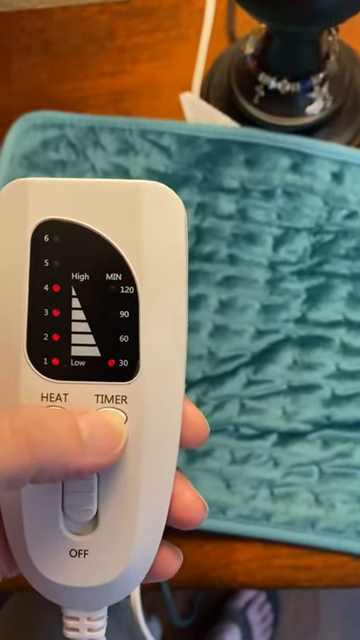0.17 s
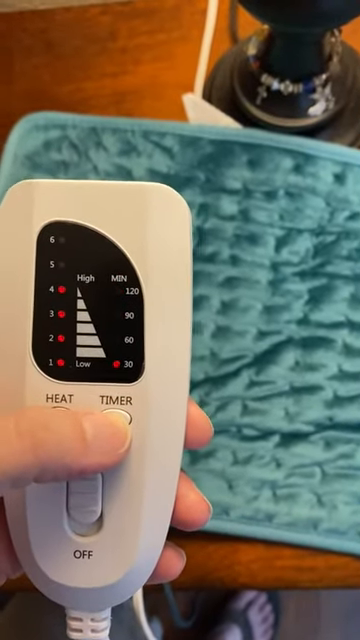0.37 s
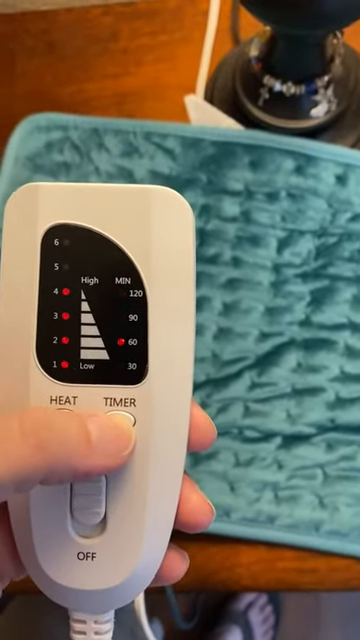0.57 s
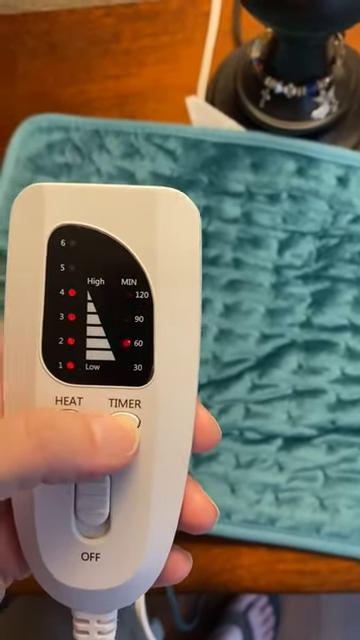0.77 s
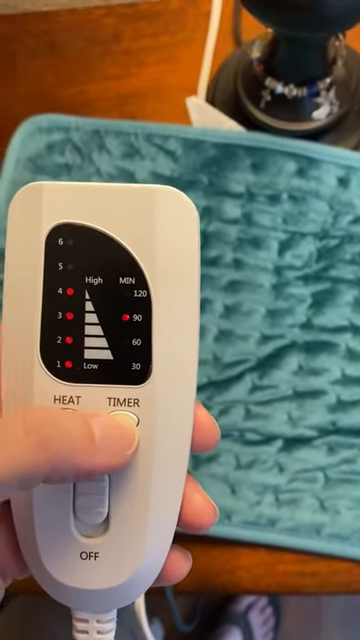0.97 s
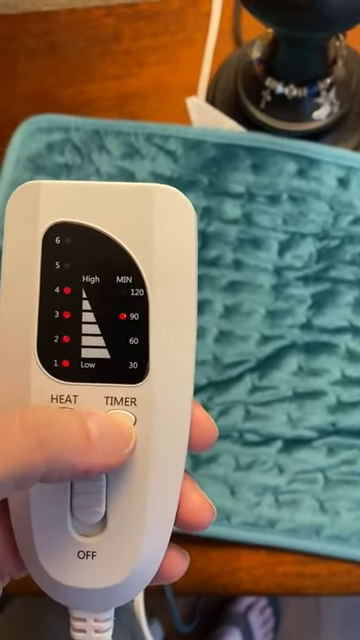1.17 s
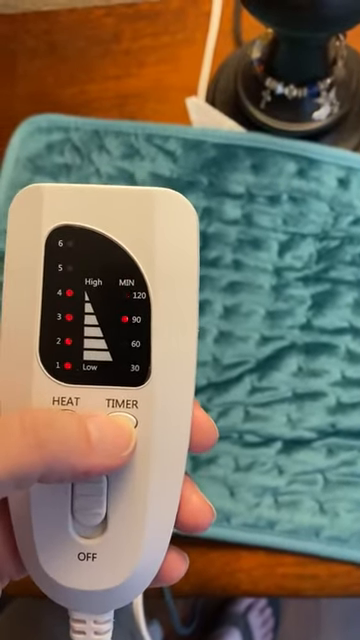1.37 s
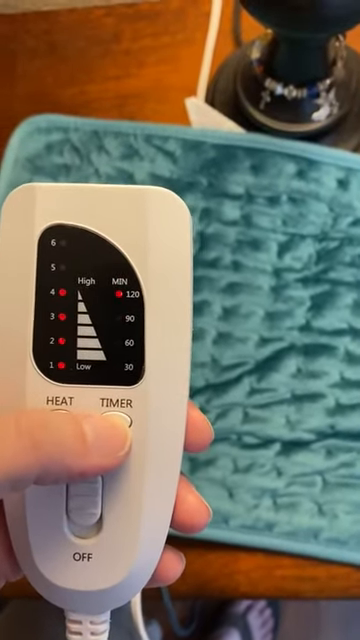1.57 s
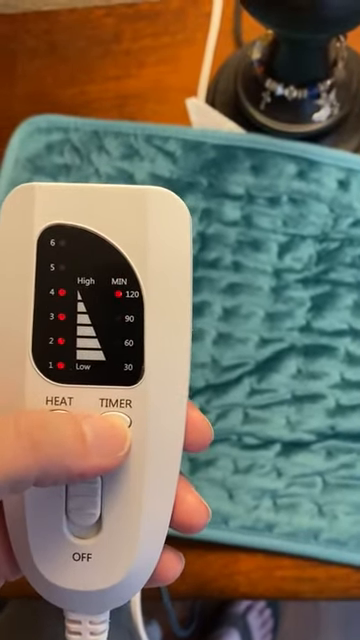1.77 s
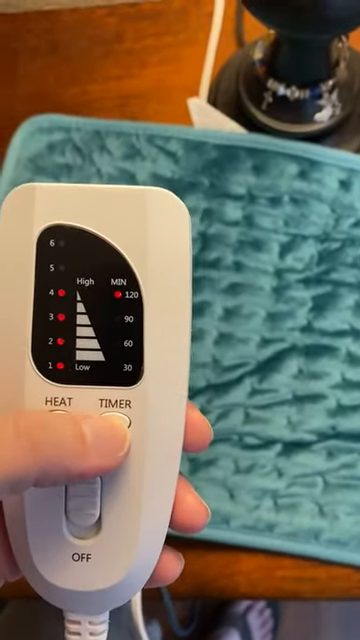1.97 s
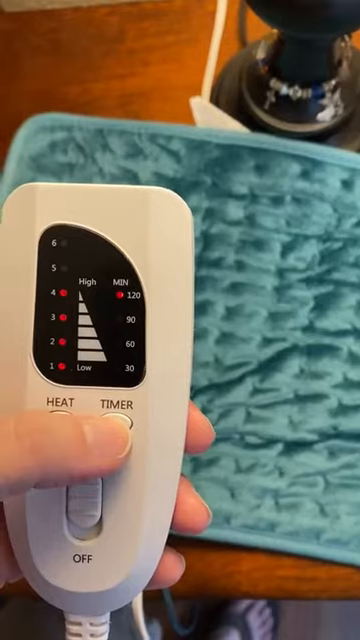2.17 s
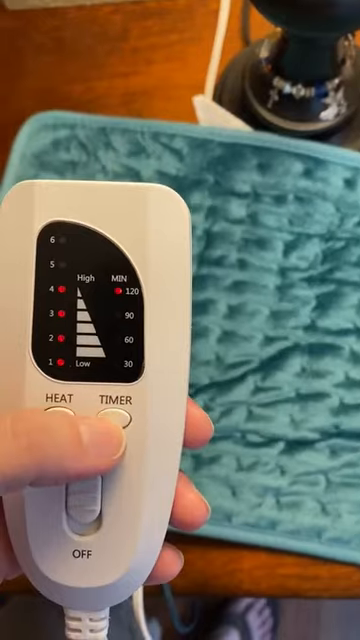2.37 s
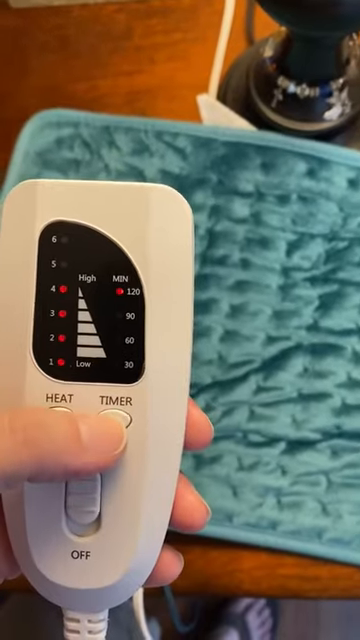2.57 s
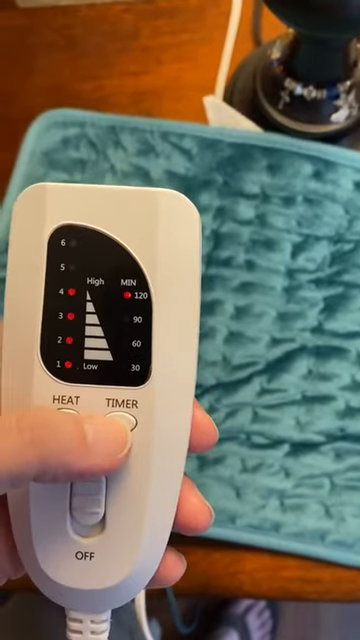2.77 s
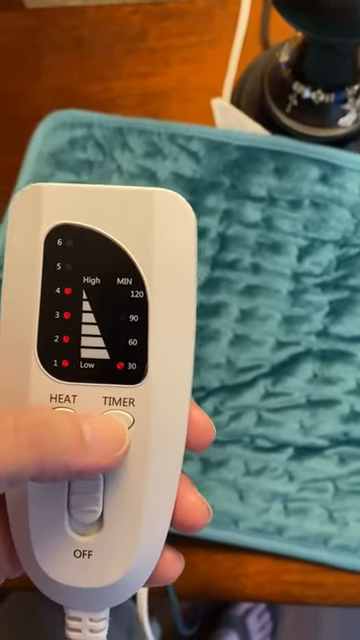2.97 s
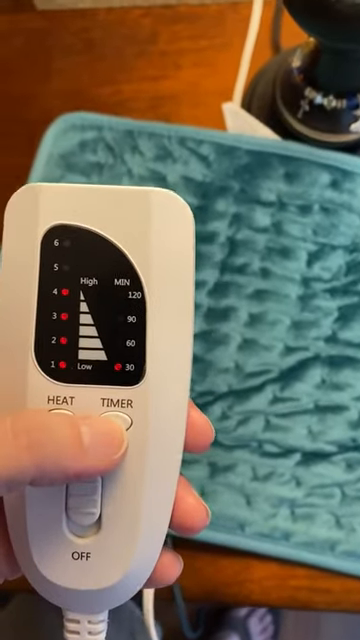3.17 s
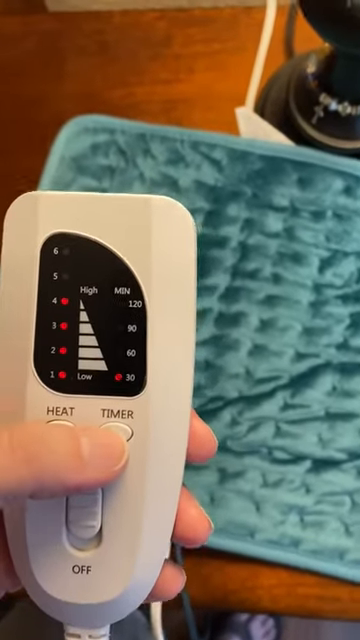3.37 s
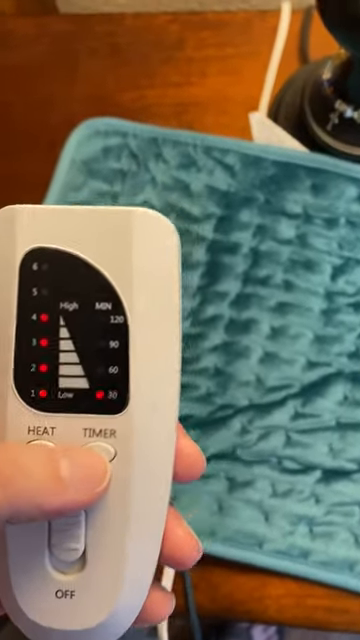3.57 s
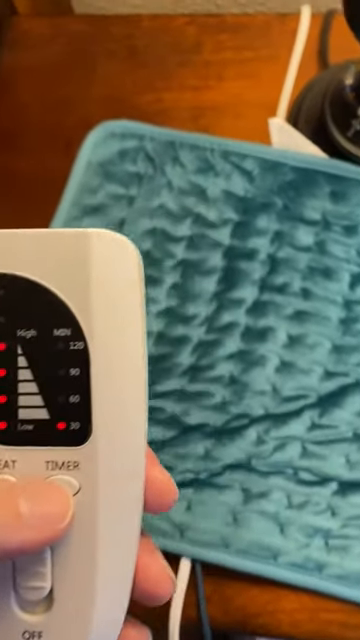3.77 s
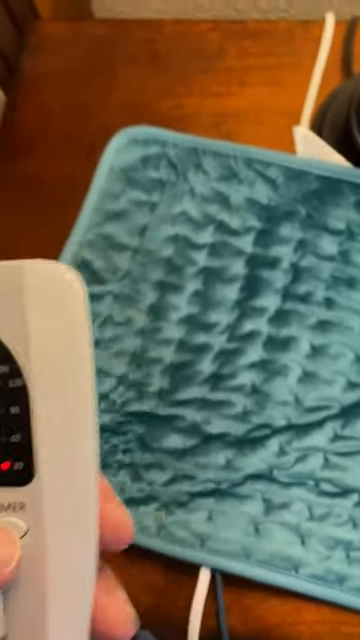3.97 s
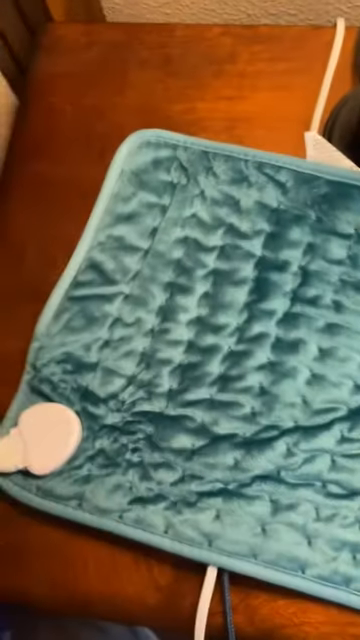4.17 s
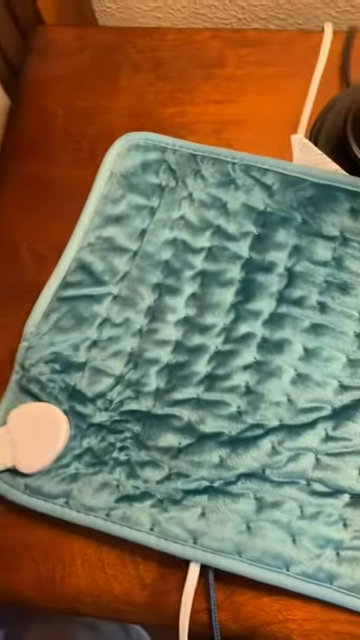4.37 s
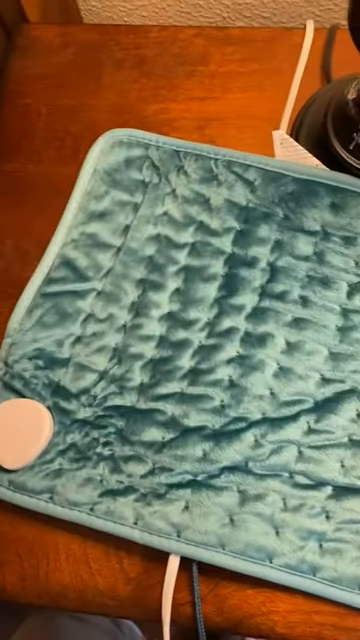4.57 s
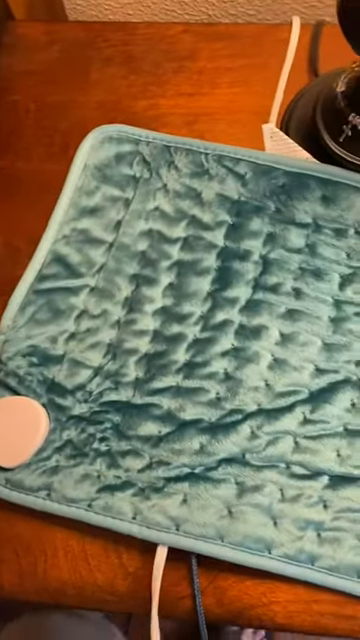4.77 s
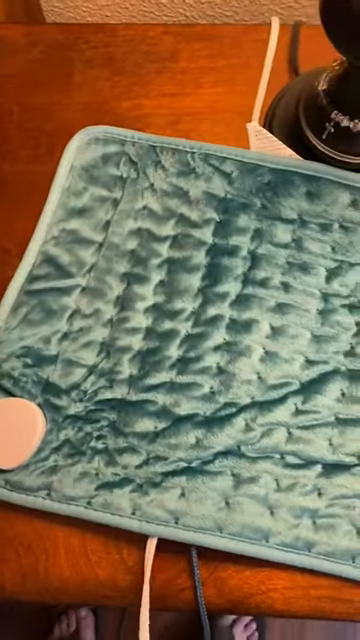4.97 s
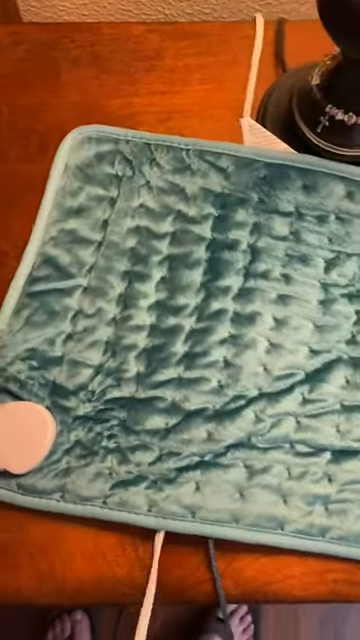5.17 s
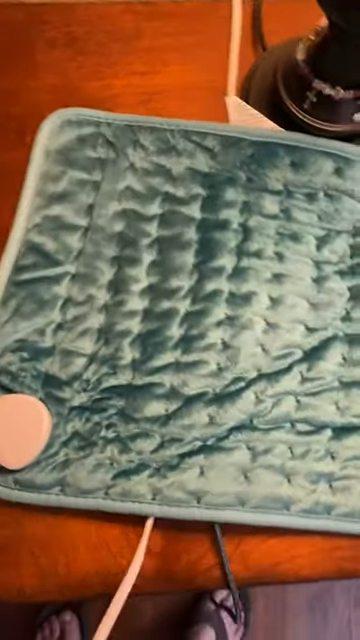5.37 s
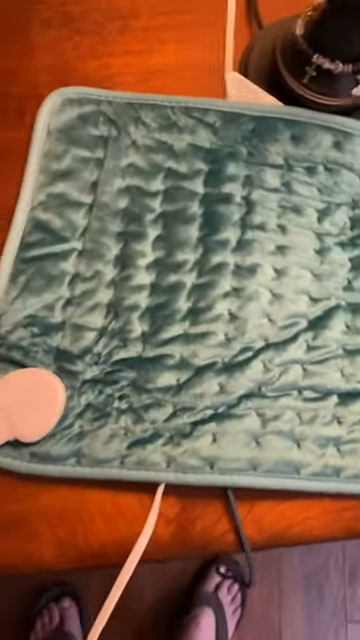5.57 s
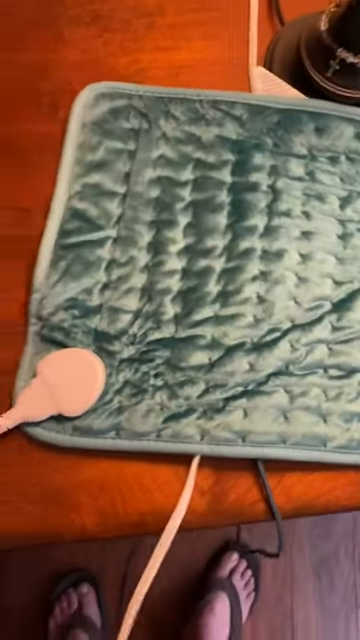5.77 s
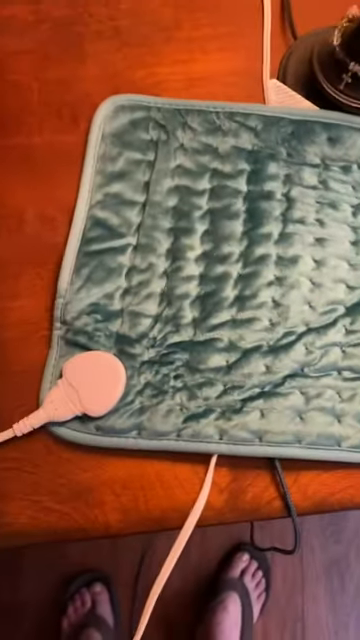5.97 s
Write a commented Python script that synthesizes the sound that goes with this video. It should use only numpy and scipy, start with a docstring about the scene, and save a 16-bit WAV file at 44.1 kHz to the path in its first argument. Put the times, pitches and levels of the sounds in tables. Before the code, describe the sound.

In a quiet room, a low boom fades as a thumb presses a button on a hollow plastic controller five times, close to the microphone. Each press snaps brightly and each release pops back duller. The case creaks faintly in the grip. Then a sleeve rustles, the controller is set down with a soft knock and a few taps, and its cord scrapes briefly over the table edge. A low hum lies underneath.

```python
"""A low boom fades in a quiet room as a thumb clicks a plastic heating-pad controller five times, close by.
Each press snaps a metal dome (bright), each release pops it back (dull); both ring the hollow case.
Between clicks the thumb rubs, the case creaks and a faint drone comes and goes. Then a sleeve rustles,
the controller is laid down at 5 s with a soft knock and a few taps, and its cord drags over the
table edge. Mains hum and room air lie under it all."""
import sys
import numpy as np
from scipy import signal
from scipy.fft import rfft, irfft
from scipy.io import wavfile
from scipy.ndimage import uniform_filter1d

SR = 44100
rng = np.random.default_rng(int(sys.argv[2]) if len(sys.argv) > 2 else 0)


def put_to_file(sound):
    """Save the sound as 16-bit audio at rate SR, in the file named by the first command-line argument."""
    columns = np.atleast_2d(sound).T  # one column per channel
    safe = np.clip(columns, -1, 1)
    whole_steps = np.round(safe * 32767)
    wavfile.write(sys.argv[1], SR, whole_steps.astype(np.int16))


N = 265041
TIME_S = np.arange(N) / SR
EVENT_SAMPLES, LEAD_SAMPLES = 8192, 128

# dome snaps in: start_s, level_db, tilt_db_per_octave
DOME_PRESSES = [(.0742, -3.5, 0.2), (.4622, -1.5, -1.23), (.8350, -1, -1.3), (1.4182, -2.93, -1.3),
                (2.8311, -0.5, 0.18)]
# dome springs back: start_s, level_db, tilt_db_per_octave
DOME_RELEASES = [(.2271, -1, -0.74), (.6184, -2.2, -2.2), (1.0026, -1.5, -2.35), (1.5942, -2, -2),
                 (3.0105, -1.5, -3)]
# case and dome modes: centre_hz, width_hz, press_db, release_db, left_minus_right_db
CASE_MODES = [(286.3, 170, -2.5, -1, 1.5), (418, 48, 3, 3, -4), (535.3, 40, 1.5, -5, -1),
              (615, 62, 6, 6.5, -4), (714, 58, 2, 8, -2.5), (829, 46, 6, 10.5, -0.5),
              (980.4, 51, 6, 9.5, 3.5), (1032, 200, -4.5, 0.5, 10), (1530, 150, -5, -8.5, 7),
              (1750, 59, -3, 2, 6), (1950, 91, -6.5, 0.5, 2), (2525, 370, -14.5, -6.5, -6),
              (2990, 470, -9, -5, 3.5), (3184, 170, 3, -1.5, -2.5), (3760, 120, -20.5, -8.5, 3.5),
              (4198, 234, 1, -10.5, 11), (4534, 240, 4, -2.5, 0.5), (5610, 270, 2.5, -7.5, 4.5),
              (5640, 150, -6.5, -14, 6.5), (6810, 400, 9.5, -8.5, -1.5), (7030, 1000, 5, -20.5, 2),
              (7740, 340, 2, -11.5, -8), (8280, 120, -13.5, -19, -6.5), (11000, 890, -3, -12, -0.5),
              (13110, 710, -16.5, -30, -1.5), (14500, 1116, -9.5, -21, 5)]
# snap radiated into the room: freq_hz, press_db, release_db
RADIATION = [(150, -24.5, -20.5), (410, -9, -1.5), (843.7, -12.5, -15.5), (1260, -20.5, -19.5),
             (1540, -18, -15), (2290, -17, -21.5), (3420, -17, -20.5), (4630, -16, -20), (6360, -22, -26),
             (9000, -29, -37.5), (11000, -28.5, -27), (16000, -36, -42)]
# path difference between two microphone ports: freq_hz, left_lead_rad
PORT_PHASE = [(6000, 0.5), (6800, 1.76), (9000, -4.5), (13300, -8.5), (16000, -14)]


def dome_snaps(snaps, modes_db, radiation, scatter_db, travel_s, chatter_db, chatter_t60_s):
    """Each snap rings the case and chatters the key cap; returns near sound and room send."""
    near, send = np.zeros((2, 2, N))
    hz, t = bins(EVENT_SAMPLES), TIME_S[:EVENT_SAMPLES]
    # bending waves cross the shell in travel_s at 1 kHz, faster when higher
    travel_rad = 4 * np.pi * travel_s * np.sqrt(1000 * hz)
    port_rad = np.outer([1, 0], along(PORT_PHASE, hz))
    path = np.exp(1j * (port_rad - travel_rad - 2 * np.pi * hz * LEAD_SAMPLES / SR))
    chatter_envelope = fade(t, chatter_t60_s) * np.minimum(t * SR / LEAD_SAMPLES, 1)
    for start_s, level_db, tilt_db in snaps:
        ring = 0
        for k, (centre_hz, width_hz, _, _, side_db) in enumerate(CASE_MODES):
            detune, scatter = rng.standard_normal(2)
            # the grip shifts each mode; neighbours swing in opposite senses
            mode = (-1) ** k * resonance(hz, centre_hz * (1 + 0.0026 * detune), width_hz)
            ring = ring + undb(modes_db[k] + scatter_db * scatter) * pan(side_db) * mode
        chatter = rng.standard_normal((2, EVENT_SAMPLES)) * chatter_envelope
        chatter = rfft(chatter / np.linalg.norm(chatter[0])) * treble(hz, corner_hz=2390)
        hardness = undb(level_db + tilt_db * np.log2(np.maximum(hz, 500) / 1500))
        click = minimum_phase(abs(ring) * hardness) * (1 + undb(chatter_db) * chatter)
        radiated = minimum_phase(undb(along(radiation, hz)) * hardness)
        add(near, start_s - LEAD_SAMPLES / SR, irfft(click * path))
        add(send, start_s, irfft(radiated)[None])
    return near, send


def button():
    """The dome snaps in bright and pops back dull; returns near sound and room send."""
    _, _, press_db, release_db, _ = np.transpose(CASE_MODES)
    hz, press_send_db, release_send_db = np.transpose(RADIATION)
    press, press_send = dome_snaps(DOME_PRESSES, press_db, np.c_[hz, press_send_db], scatter_db=1.73,
                                   travel_s=0.0009, chatter_db=-9.5, chatter_t60_s=0.012)
    release, release_send = dome_snaps(DOME_RELEASES, release_db, np.c_[hz, release_send_db],
                                       scatter_db=2, travel_s=0.0014, chatter_db=0, chatter_t60_s=0.035)
    return press + release, press_send + release_send


# parts inside the case: centre_hz, width_hz, gain_db
INNER_MODES = [(1610, 9, -3.5), (4470, 30, -11)]


def inner_ring(clicks):
    """Lightly damped parts ring on after each click."""
    hz = bins(2 * N)
    modes = sum(undb(db) * resonance(hz, centre_hz, width_hz) for centre_hz, width_hz, db in INNER_MODES)
    return irfft(rfft(clicks, 2 * N) * modes)[:, :N]


# slips in the grip: start_s, level_db, centre_hz, t60_s
CASE_CREAKS = [(.755, -5, 530, .044), (0.757, -34.5, 6340, .13), (.786, -7.5, 480, .076),
               (.793, -31.5, 6000, .05), (1.09, -19.5, 740, .07), (1.506, -18, 885, .06),
               (2.287, -32.5, 2307, .05), (2.369, -22, 855, .2), (2.494, -16, 800, .035),
               (2.594, -16, 850, 0.14), (2.6, -36, 1800, .2), (3.101, -10.5, 484, .1),
               (3.143, -17.5, 539, 0.082), (3.632, -31.5, 11620, 0.065), (4.031, -25.5, 790, 0.065)]


def creaks(width_ratio=0.18):
    """The case slips in the hand, each time in one narrow resonance."""
    return ticks([(start_s, db, hz, width_ratio * hz, t60_s) for start_s, db, hz, t60_s in CASE_CREAKS])


# light contacts: start_s, level_db, centre_hz, width_hz, t60_s
LANDING_TAPS = [(5.008, -23.5, 890, 580, 0.062), (5.030, -26.5, 3020, 5040, 0.069),
                (5.064, -7, 710, 360, 0.17), (5.6236, -28, 5960, 1100, 0.015),
                (5.6655, -29, 6520, 1210, 0.017), (5.7694, -12.5, 5100, 2340, 0.028),
                (5.771, -3.5, 915, 202, 0.069), (5.773, -1.5, 374, 119, 0.094),
                (5.777, -14, 4950, 2334, 0.04), (5.825, -25, 1350, 1990, 0.03),
                (5.897, -35.5, 1930, 2400, .018)]


def taps():
    """Case and cord tap against things as they are laid down."""
    return ticks(LANDING_TAPS)


# cushioned blows: start_s, level_db, pitch_hz, t60_s
LANDING_KNOCKS = [(5.008, -44, 410, 0.045), (5.064, -35, 346, 0.048), (5.082, -29, 322, 0.028),
                  (5.096, -31.5, 69.5, 0.18), (5.104, -37.5, 143, 0.19)]


def knocks(contact_s=0.012):
    """The controller comes to rest: low damped swings with a soft start."""
    out, t = np.zeros((2, N)), TIME_S[:2 * EVENT_SAMPLES]
    for start_s, level_db, pitch_hz, t60_s in LANDING_KNOCKS:
        envelope = undb(level_db) * fade(t, t60_s) * (1 - fade(t, contact_s))
        add(out, start_s, pan(-1.2) * envelope * np.sin(2 * np.pi * pitch_hz * t))
    return out


# arm movements: start_s, length_s, level_db, hiss_relative_db, fold_hz
ARM_STROKES = [(3.662, 0.32, -91, 5, 900), (4.166, 0.23, -76, -6.5, 1480), (4.382, .22, -77.5, -3.5, 4270),
               (4.572, 0.14, -65, 1, 1960), (4.719, 0.24, -65.5, -7.5, 875),
               (4.971, 0.068, -61.5, -1.5, 950), (5.125, 0.064, -67, -5, 880),
               (5.222, 0.46, -80.5, 0.5, 2650), (5.715, 0.091, -69.5, -3, 1500)]
# cloth rustle: freq_hz, level_db
CLOTH_SPECTRUM = [(200, -10), (400, -3.5), (900, -1.5), (1400, -6), (2500, -6.5), (4000, -13), (8000, -28),
                  (16000, -42)]
# fibre hiss: freq_hz, level_db
FIBRE_SPECTRUM = [(1000, -7), (2500, -1.5), (4500, 3), (7000, 4.5), (9000, -10.5), (11000, 3),
                  (16000, -9.5)]


def sleeve(fold_db=-4.5, fold_q=2.1):
    """Each arm stroke rustles the cloth, makes the fibres hiss and sounds a hollow fold."""
    *_, hiss_db, fold_hz = np.transpose(ARM_STROKES)
    gains = stroke_gains(ARM_STROKES, attack_s=0.065, release_t60_s=0.54)
    cloth_gain = np.linalg.norm(gains, axis=0)
    fibre_gain = np.linalg.norm(gains * undb(hiss_db)[:, None], axis=0)
    cloth = friction(CLOTH_SPECTRUM, grain_db=1.5, grain_hz=250, patchy_db=-1, alike_hz=400)
    fibres = friction(FIBRE_SPECTRUM, grain_db=2, grain_hz=1400, patchy_db=2.9, alike_hz=417)
    out = cloth_gain * cloth + fibre_gain * fibres
    slips = diffuse(alike_hz=700) * undb(3.3 * wander(120))
    for gain, hz in zip(gains, fold_hz):
        peak = signal.iirpeak(hz, fold_q, fs=SR)
        fold = signal.lfilter(*peak, signal.lfilter(*peak, slips))
        out += undb(fold_db) * gain * fold / fold.std()
    return out


# thumb slides: start_s, length_s, level_db
THUMB_RUBS = [(.1, 0.59, -74), (.75, 0.15, -64), (1.04, .09, -84.5), (1.64, 0.078, -96.5),
              (2.345, 0.087, -75), (2.56, 0.087, -72), (2.68, 0.11, -78.5), (3.06, 0.12, -78.5),
              (3.85, 0.14, -81)]
# skin on plastic: freq_hz, level_db
RUB_SPECTRUM = [(200, -22), (450, -3), (850, -6), (1300, -16), (2000, -18.5), (3000, -25.5), (6000, -42)]


def thumb(grip_db=-87.5):
    """The thumb rubs the case, over the faint constant stir of the grip."""
    rubs = stroke_gains(THUMB_RUBS, attack_s=0.052, release_t60_s=0.39)
    gain = np.hypot(np.linalg.norm(rubs, axis=0), undb(grip_db))
    return gain * friction(RUB_SPECTRUM, grain_db=2.5, grain_hz=250, patchy_db=3, alike_hz=910)


# cord scrape: freq_hz, level_db
CORD_SPECTRUM = [(250, -17), (400, 5.5), (800, 2.5), (1300, -8), (1670, -8.5), (1940, 12.5), (2300, -5.5),
                 (2900, -3), (3700, -11), (4700, -8.5), (7000, -38), (12000, -57)]


def cord(level_db=-59):
    """The cord scrapes over the table edge."""
    gain = undb(level_db) * swell(start_s=5.9, length_s=0.082, attack_s=0.037, release_t60_s=0.26)
    return gain * friction(CORD_SPECTRUM, grain_db=2.5, grain_hz=500, patchy_db=1, alike_hz=900)


def reflections(send):
    """Table and hand answer within milliseconds, the furnished room a little later."""
    bright = irfft(rfft(send) * treble(bins(N), corner_hz=900), N)
    table = echoes(bright, level_db=2, t60_s=0.08, delay_s=0.0033, build_s=0.0018, pan_db=1.5)
    room = echoes(send, level_db=-5.5, t60_s=0.34, delay_s=0.018, build_s=0.0058, pan_db=1)
    return table + room


def boom(level_db=-42.5):
    """A low opening boom sags in pitch and dies away."""
    gain = undb(level_db) * swell(start_s=0, length_s=0.26, attack_s=0.012, release_t60_s=2.8)
    return pan(0.3) * gain * tone(pitch_hz=56.6, glide_hz_per_s=-11)


def mains_hum(level_db=-55):
    """Steady hum at the mains frequency."""
    return pan(0.3) * undb(level_db) * tone(pitch_hz=60)


# faint tones: start_s, length_s, pitch_hz, glide_hz_per_s, level_db
DRONE_TONES = [(1.803, .68, 312.2, 8, -70), (3.087, 0.44, 349, -26.5, -75)]


def drone(waver_db=1.5):
    """A faint gliding drone comes and goes, wavering in level."""
    out = np.zeros(N)
    for start_s, length_s, pitch_hz, glide_hz_per_s, level_db in DRONE_TONES:
        gain = undb(level_db) * swell(start_s, length_s, attack_s=0.17, release_t60_s=1.3)
        out += gain * tone(pitch_hz, glide_hz_per_s, start_s)
    return out * undb(waver_db * wander(7))


# still air: freq_hz, level_db
AIR_SPECTRUM = [(50, -28.5), (90, -1.5), (160, -4.5), (205, -15), (300, -13.5), (400, -21), (660, -36.5),
                (1750, -41.5), (3600, -47), (6300, -47), (9000, -58), (16000, -60.5)]


def room_air(level_db=-63, dip_db=-7.5):
    """Still room air, whose bass dips for about a second."""
    still = undb(level_db) * colour(diffuse(alike_hz=353), AIR_SPECTRUM)
    bass = irfft(rfft(still) * (1 - treble(bins(N), corner_hz=670)), N)
    dip = undb(dip_db * swell(start_s=3.65, length_s=0.99, attack_s=0.6, release_t60_s=1.7))
    return still + (dip - 1) * bass


def rumble(level_db=-58.5):
    """Steady low room noise."""
    spectrum = [(15, -38), (35, -19.5), (58, 1.5), (85, -7.5), (125, -17.5), (190, -44), (800, -84.5)]
    return undb(level_db) * colour(diffuse(alike_hz=182), spectrum)


def ticks(contacts):
    """Brief rough contacts, each through one steep-sided resonance."""
    out, hz, t = np.zeros((2, N)), bins(EVENT_SAMPLES), TIME_S[:EVENT_SAMPLES]
    for start_s, level_db, centre_hz, width_hz, t60_s in contacts:
        noise = rng.standard_normal((3, EVENT_SAMPLES))  # left, right, common
        burst = (noise[:2] + 0.76 * noise[2]) * fade(t, t60_s)
        burst /= np.linalg.norm(burst[0])
        body = resonance(hz, centre_hz, 2 * width_hz) ** 2
        add(out, start_s, undb(level_db) * irfft(rfft(burst) * body))
    return out


def friction(spectrum, grain_db, grain_hz, patchy_db, alike_hz):
    """Sliding contact: tiny uneven slips, coming in patches; rms 1."""
    slips = diffuse(alike_hz) * undb(grain_db * wander(grain_hz) + patchy_db * wander(35))
    return colour(slips, spectrum)


def echoes(x, level_db, t60_s, delay_s, build_s, pan_db):
    """A diffuse wash that builds after a delay and dies away."""
    t = TIME_S[:3 * EVENT_SAMPLES]
    onset = np.clip((t - delay_s) / build_s, 0, 1)
    response = rng.standard_normal((2, len(t))) * fade(t, t60_s) * onset
    response *= undb(level_db) * pan(pan_db) / np.linalg.norm(response[0])
    return signal.fftconvolve(x, response, axes=1)[:, :N]


def tone(pitch_hz, glide_hz_per_s=0, start_s=0):
    """Sine of rms 1 with a linear glide."""
    t = TIME_S - start_s
    return np.sqrt(2) * np.sin(2 * np.pi * (pitch_hz + glide_hz_per_s * t / 2) * t)


def diffuse(alike_hz):
    """Stereo noise, alike below alike_hz and unrelated above."""
    mid, side = rfft(rng.standard_normal((2, N)))
    apart = bins(N) / np.hypot(bins(N), alike_hz)
    return irfft((mid + np.array([[1], [-1]]) * apart * side) / np.sqrt(1 + apart ** 2), N)


def wander(rate_hz):
    """Smooth random drift, spread 1."""
    hold = max(int(SR / rate_hz), 1)
    steps = np.repeat(rng.standard_normal(N // hold + 1), hold)
    drift = uniform_filter1d(steps, hold)[:N]
    return drift / drift.std()


def stroke_gains(strokes, attack_s, release_t60_s):
    """One gain curve per sliding stroke."""
    return np.array([undb(level_db) * swell(start_s, length_s, attack_s, release_t60_s)
                     for start_s, length_s, level_db, *_ in strokes])


def swell(start_s, length_s, attack_s, release_t60_s):
    """Envelope: smooth rise, hold, decay."""
    rise = np.sin(np.pi / 2 * np.clip((TIME_S - start_s) / attack_s, 0, 1)) ** 2
    return rise * fade(np.maximum(TIME_S - start_s - length_s, 0), release_t60_s)


def fade(t, t60_s):
    """Exponential decay, 60 dB in t60_s."""
    return np.exp(-np.log(1000) * t / t60_s)


def resonance(hz, centre_hz, width_hz):
    """One damped mode, gain 1 at its centre."""
    return 1j * width_hz * hz / (centre_hz ** 2 - hz ** 2 + 1j * width_hz * hz)


def treble(hz, corner_hz):
    """Second-order high-pass gain."""
    return hz ** 2 / np.hypot(hz ** 2, corner_hz ** 2)


def minimum_phase(gain):
    """Spectrum with these gains whose sound starts at once, then dies away."""
    cepstrum = irfft(np.log(gain))
    half = cepstrum.shape[-1] // 2
    causal = np.r_[1, np.full(half - 1, 2), 1, np.zeros(half - 1)]
    return np.exp(rfft(cepstrum * causal))


def colour(x, spectrum):
    """Filter by rows of freq_hz, level_db; rms 1."""
    size = x.shape[-1]
    y = irfft(rfft(x) * undb(along(spectrum, bins(size))), size)
    return y / y.std()


def along(points, hz):
    """Interpolate rows of freq_hz, value over log frequency."""
    freq_hz, value = np.transpose(points)
    return np.interp(np.log(hz), np.log(freq_hz), value)


def bins(size):
    """FFT frequencies, floored at 1 Hz."""
    return np.maximum(np.fft.rfftfreq(size, 1 / SR), 1)


def pan(db):
    """Stereo gains, left minus right in dB."""
    return undb(np.array([[db], [-db]]) / 2)


def undb(db):
    """Decibels to gain."""
    return 10 ** (np.asarray(db) / 20)


def add(out, start_s, sound):
    """Mix a sound in at start_s."""
    i = max(int(round(start_s * SR)), 0)
    out[:, i:i + sound.shape[1]] += sound[:, :max(N - i, 0)]


def scene():
    """Clicks and handling with their reflections, then sliding sounds and background."""
    clicks, click_send = button()
    handling = creaks() + taps() + knocks()
    reflected = reflections(click_send + undb(-9.5) * handling + undb(-23) * clicks)
    sliding = sleeve() + thumb() + cord()
    background = boom() + mains_hum() + drone() + room_air() + rumble()
    return clicks + inner_ring(clicks) + handling + reflected + sliding + background


def record(dry):
    """Steep low-pass on the top treble."""
    cutoff_hz = 16400
    return signal.sosfilt(signal.ellip(8, 0.2, 80, cutoff_hz, fs=SR, output="sos"), dry)


dry = scene()
out = record(dry)
put_to_file(out)
```